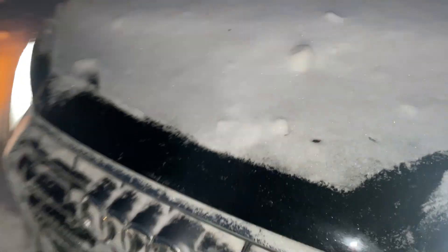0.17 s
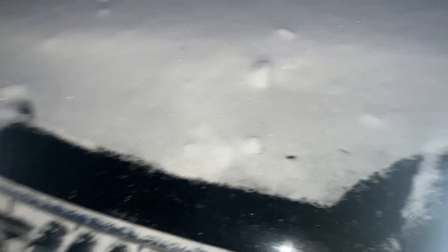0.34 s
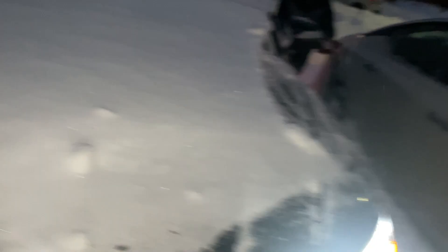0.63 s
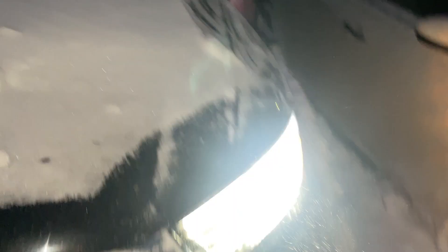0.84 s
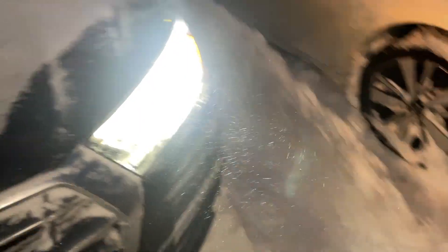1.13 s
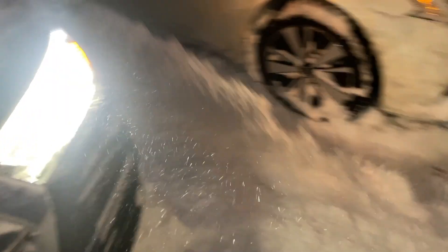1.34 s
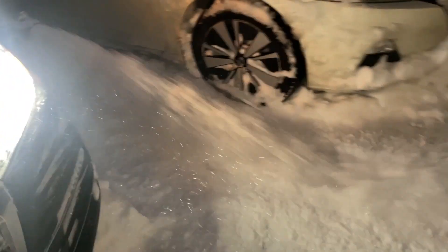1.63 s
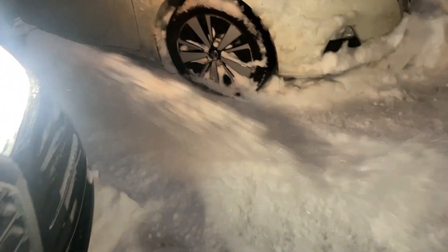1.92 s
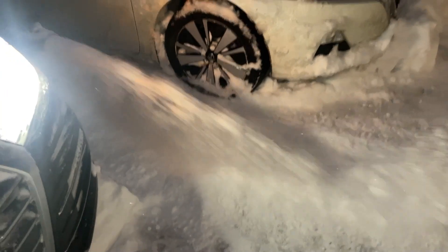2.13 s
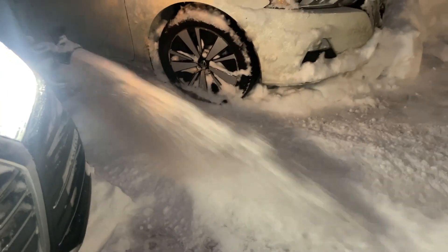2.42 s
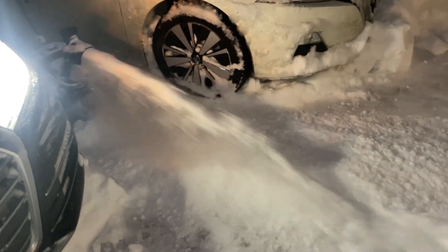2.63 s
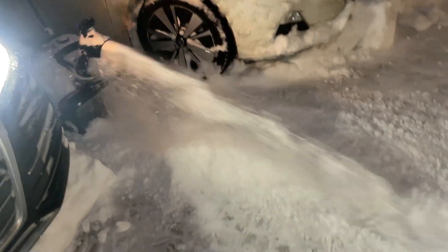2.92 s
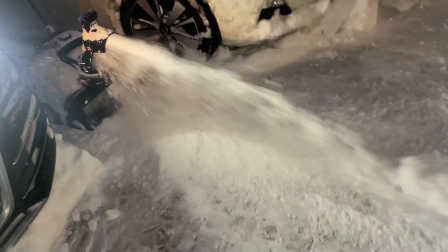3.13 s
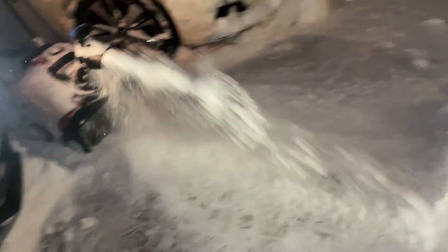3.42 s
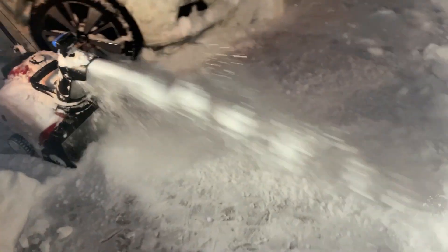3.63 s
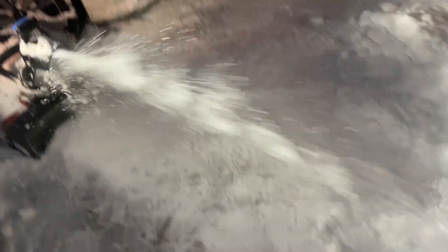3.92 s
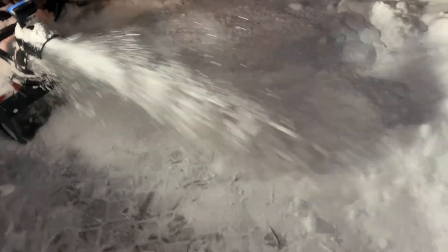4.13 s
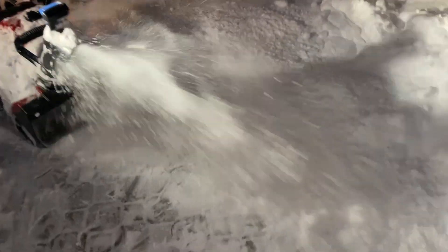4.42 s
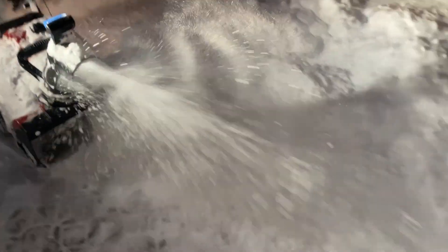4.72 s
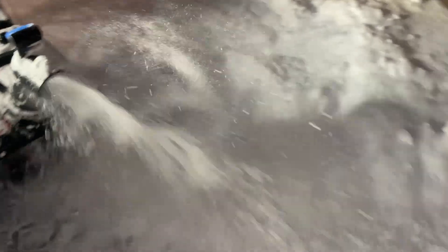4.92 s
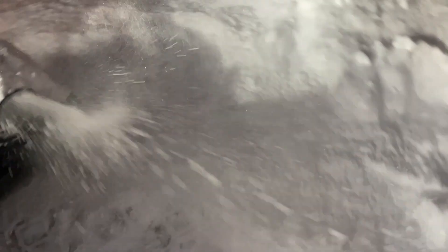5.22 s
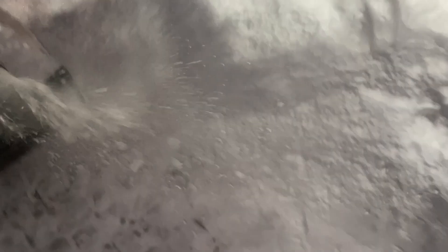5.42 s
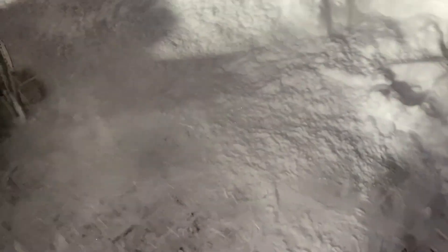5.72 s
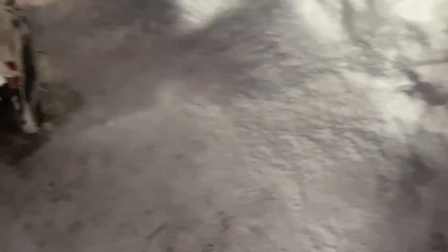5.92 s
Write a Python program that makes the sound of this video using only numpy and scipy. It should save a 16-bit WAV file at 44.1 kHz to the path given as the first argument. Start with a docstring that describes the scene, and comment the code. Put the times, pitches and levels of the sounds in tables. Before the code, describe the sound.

Outdoors between parked cars, a small petrol snow blower runs throughout, heard close on a hand-held phone. Dull and on the right at first, it swings quickly left, its fast putter, gritty exhaust and wavering low drone growing. Snow churns and hisses, with hollow knocks, panel rattle and scattered metallic pops. Near the end the drone drops away, leaving a softer engine hum, thin tones and bright ice ticks.

```python
"""Between parked cars, a single-cylinder snow blower passes a hand-held phone. The engine is a sum of multiples
of its firing rate and pulses that ring the muffler; the exhaust is noise gated by the valve. A belt drives a
three-blade impeller, a harmonic drone that sags with the load and combs with its echo off a car. Snow churns
and hisses as flickering noise bands; knocks, pops, rattle, a squeak, tones and ice ticks are added. The phone
turns, so phase and balance between two ports carry the machine from right to left."""
import sys
import numpy as np
from scipy import signal
from scipy.fft import rfft, irfft, next_fast_len
from scipy.io import wavfile
from scipy.ndimage import uniform_filter1d

SR = 44100
rng = np.random.default_rng(int(sys.argv[2]) if len(sys.argv) > 2 else 0)


def int16_out(signal):
    """Quantize to a 16-bit WAV file."""
    q = np.round(np.clip(np.atleast_2d(signal).T, -1, 1) * 32767)
    wavfile.write(sys.argv[1], SR, q.astype(np.int16))


N = 267157
T = np.arange(N) / SR  # time in seconds
LONG = next_fast_len(N)

# Engine speed. Each row: time in seconds, firings per second.
ENGINE_SPEED = [(0.0, 33.9), (0.3, 30.91), (0.42, 31.32), (0.72, 34.52), (0.9, 33.07), (1.05, 33.06),
                (1.23, 35.12), (1.65, 34.12), (1.8, 31.53), (2.07, 32.09), (2.4, 35.1), (2.85, 34.87),
                (3.0, 33.84), (3.66, 35.29), (3.72, 34.81), (3.99, 35.71), (4.32, 33.66), (4.98, 37.24),
                (5.25, 35.47), (5.49, 36.79), (6.06, 36.43)]
FIRST_FIRING = .45  # share of a cycle that passes before the first firing
# Engine note. Each row: multiple of the firing rate, relative level in dB.
ENGINE_ORDERS = [(1, -18), (3, -8), (4, -10), (5, 0), (6, -3), (7, -2), (8, -5), (9, -14), (10, -17)]
# Muffler resonances. Each row: frequency in Hz, width of a single pass in Hz, relative level in dB.
MUFFLER_MODES = [(570, 110, -8), (735, 45, -7), (815, 45, -7), (1145, 40, -12), (1215, 40, -8)]
EMPTY_S = 5.15  # the housing has run empty and its drone is gone
# The engine note under load, and the rise and its duration as the machine runs empty.
NOTE_DB, NOTE_CLEARS_DB, NOTE_CLEARS_S = -32, 6.5, .6

# Source levels before the ports. Each row: time in seconds, crank thump in dB, churn in dB, treble in dB,
# exhaust puff against hiss in dB, the same for the bands centred on 8 kHz and above in dB.
SOURCE_LEVELS = [(0, -26, -24.5, -41.5, 1, 0), (.35, -23.5, -26.5, -29.5, 6.5, 11),
                 (.71, -20.5, -20, -26.5, 8.5, 5.5), (1.38, -21, -21, -27, 8, 5.5),
                 (1.6, -21, -21.5, -25.5, 9, 6), (2.08, -21, -19.5, -23, 7.5, 16),
                 (2.6, -23, -20, -26.5, 5, 1.5), (2.9, -23.5, -17, -24, -0.5, -0.5),
                 (3.9, -23, -18.5, -26, 3.5, 0), (4.2, -31, -16.5, -28, -1.5, -3),
                 (4.6, -24, -23.5, -26.5, 1.5, -2), (4.98, -27.5, -18.5, -30.5, -5.5, -2),
                 (5.38, -26.5, -23.5, -33.5, -8, -5), (5.63, -28, -25, -36.5, -5, -14),
                 (6.06, -26, -26.5, -29.5, -14, -12)]
# Exhaust colour. Each row: frequency in Hz, relative density in dB per Hz.
GAS_COLOUR = [(600, -5), (1200, 4), (1900, 5.5), (2600, 0), (3400, 2), (4600, -4), (5100, -1.5), (5600, -9),
              (7500, -7.5), (9800, -1.5), (11500, -5), (12350, -0.5), (13500, -14), (14500, -11),
              (16300, -34)]
# The valve shuts with a smaller spit: share of the cycle, mean level in dB.
VALVE_AT, VALVE_DB = .45, -12

BELT_RATIO = 1.615  # blade beats per firing where the belt grips
# Belt slip under a heavy bite. Each row: middle in seconds, half length in seconds, peak share of blade speed lost.
BELT_SLIPS = [(.67, .06, .025), (.92, .07, .02), (1.3, .05, .012), (1.63, .11, .022)]
# The three blades bite unevenly. Each entry: level of one blade in dB, before smoothing.
BLADE_BITE_DB = [1, -0.028, 2.4]
# Blade harmonics. Each row: multiple of the blade rate, relative level in dB, phase in radians.
BLADE_ORDERS = [(2, -8.5, 3.5), (3, -0.4, 0.5), (4, 2.6, 1), (5, -4.5, 0.42), (1, -15.5, 2.5),
                (6, -25, -0.5), (7, -20.5, 0)]
# Housing drone. Each row: time in seconds, drive in dB, delay of the echo off the nearest car in ms.
HOUSING_DRONE = [(0, -25, 7.4), (.25, -25.5, 8.05), (.59, -24, 7.9), (.87, -20.5, 8.1), (1.3, -21.5, 7.1),
                 (1.58, -19, 7), (1.7, -18, 6.4), (2.1, -15.5, 6.36), (2.41, -19, 5.66), (2.68, -15.5, 6.2),
                 (2.92, -16, 5.57), (3.18, -13.5, 6.54), (3.55, -17.5, 6.7), (3.76, -17.5, 7.25),
                 (4.21, -16.5, 7.8), (4.46, -17.5, 6.54), (4.77, -19.5, 5.85), (4.99, -28, 4.3)]
CAR_ECHO = 0.47  # share of the drone's amplitude that the car sends back
# Brief dips of the drone. Each row: time in seconds, change in dB.
DRONE_DIPS = [(.47, -4), (.94, -1), (1.62, -5.5), (1.95, -6.5), (4.33, -2)]
DIP_S = 0.028  # half length of a dip
# Colour of the drone. Each row: time in seconds, dB added to blade multiple 2, to 4, to 5, to both 6 and 7.
DRONE_TINT = [(0, 3, 0.5, 0, 5.5), (.7, 2, -1.5, 4.5, 7), (1, 2, 1, 4.5, -3), (1.35, 7, 0.5, 2.5, -4),
              (1.6, -2, 3.5, -4.5, -12), (1.85, 2, -4.5, 0, -23), (2.3, -3, -5, -1, -4),
              (2.85, 5, -2, 1, -16), (3.15, -4, -3.5, 0, -2), (3.4, 2.5, -4, 0.5, 8.5), (3.7, 0.5, 2, 0, 6),
              (3.95, -5, -0.5, -1, 1.5), (4.2, -1, 1.5, -4, 2), (4.4, -5, 0, -2.5, 9.5),
              (4.6, 2, -11, -7, 9.5), (4.8, 6.5, -7, 0.5, 6), (4.95, 11, -1, -8, 8)]

# Colour of tumbling snow. Each row: frequency in Hz, relative density in dB per Hz.
CHURN_COLOUR = [(30, -5), (60, -5), (120, 1.5), (200, 11.5), (300, 3.5), (420, -1.5), (620, 0), (800, -3.5),
                (1050, -9), (1350, -13), (1550, -19), (2500, -23.5)]
# Lumps of packed snow burst through the auger. Each row: time in seconds, swell of the churn in dB.
SNOW_LUMPS = [(.81, 3.5), (2.83, 3.5), (4.17, 1.5), (4.42, 5.5), (4.59, 8.5), (6.02, 6.5)]
LUMP_RISE_S, LUMP_FALL_S = 0.026, 0.11  # time constants

# Loose panels. Each row: time in seconds, level in dB.
PANEL_RATTLE = [(0, -39), (1, -36.5), (2.1, -29.5), (2.9, -28), (4.2, -33.5), (4.9, -32.5), (6.06, -32.5)]
# The hardest puffs ring the muffler shell. Each row: start in seconds, envelope peak in dB, pitch in Hz.
SHELL_POPS = [(0.326, -38, 4300), (0.575, -26, 1470), (0.606, -25, 1800), (0.636, -15, 2240),
              (0.753, -29, 1730), (0.782, -21, 1710), (0.841, -26, 1720), (1.0235, -27, 1790),
              (1.053, -17, 1700), (1.1116, -18, 2230), (1.634, -23, 1660), (1.6634, -20, 2190),
              (1.7245, -18.5, 3630), (1.817, -17, 3490), (1.943, -21, 4240), (2.069, -23, 1440),
              (2.1297, -17.5, 3330), (2.159, -20, 3270), (2.1896, -18, 3460), (2.4223, -22, 4310),
              (2.4508, -22, 3500), (2.508, -17.5, 3830), (2.702, -29, 3900), (2.7352, -25, 2520),
              (2.765, -29, 2480), (2.8217, -20, 2630), (3.1735, -26, 2930), (3.4629, -19, 2595),
              (3.578, -19, 3060), (3.8064, -14.5, 2950), (3.8636, -16, 2810), (3.9764, -21, 3290),
              (4.2612, -19.5, 3470), (4.3204, -20.5, 3620), (4.9614, -39, 3400), (4.9954, -39, 2560)]
POP_RISE_S, POP_RING_S = .0012, .003  # time constants
POP_ROUGH = .7  # depth of the noise on the ring
# The chute knocks in spells as it fills. Each row: middle in seconds, half length in seconds,
# pitch in Hz, level in dB, ring time in seconds.
CHUTE_KNOCKS = [(.9, 0.22, 770, -31, 0.0017), (1.202, 0.38, 617, -32, 0.01), (1.61, 0.27, 806, -28, 0.0015),
                (1.786, 0.064, 707, -25, 0.0025), (2.41, 0.26, 576, -31, 0.0014),
                (3.09, 0.42, 801, -29, 0.0015), (3.853, 0.39, 710, -30.5, 0.013),
                (3.7, 1, 1223, -38.5, 0.00086), (4.175, 0.067, 1076, -22.5, 0.0014),
                (4.95, 0.14, 747, -28, 0.0023)]
# A brief squeak. The entries: middle in seconds, half length in seconds, pitch in Hz, peak level in dB.
SQUEAK_TONE = (.95, .03, 1500, -28)
# Multiples sing out as the machine runs free. Each row: multiple of the firing rate, middle in seconds,
# half length in seconds, level in dB.
SINGING_ORDERS = [(5, 5.25, .15, -28), (7, 5.0, .07, -28), (8, 5.25, .17, -30), (6, 5.5, .08, -31),
                  (20, 5.85, .3, -38), (22, 5.62, .13, -35), (23, 5.97, .08, -39), (33, 5.68, .22, -40)]
# Ice grains tick near the phone. Each row: start in seconds, level of the noise in dB before envelope and filters.
ICE_TICKS = [(5.185, -22), (5.325, -20), (5.338, -21), (5.355, -22), (5.3714, -24), (5.385, -14.5),
             (5.4044, -21), (5.421, -22), (5.4367, -22), (5.7546, -19), (5.788, -20), (5.8227, -19),
             (5.8947, -13), (5.921, -13), (5.933, -14)]

# Phone heading. Each row: time in seconds, heading (-1 machine on the right, 1 on the left),
# then the level of each of the four shaded bands in dB.
PHONE_TURN = [(0, -1.48, -5, 6, 2, -1.5), (.5, -0.41, -0.5, 1.5, -1.8, -0.45), (1.2, 0.31, 3, 4, -2, -0.69),
              (1.5, 0.81, 1.5, 3, -1.5, 0.047), (2.7, 0.96, -2, 4.5, -0.2, 1.5),
              (4.5, 1.03, -4, 1.7, -2, 1.2), (5.6, 1.3, -3.5, 1, 1, 0.94),
              (6.06, 1.24, -3, -3.5, -3.5, 0.89)]
# Bands that hand and car bodies shade. Each row: lower edge in Hz, upper edge in Hz.
SHADED_BANDS = [(1500, 2000), (5600, 7500), (9000, 16500), (4900, 5600)]
# Two microphone ports. Each row: frequency in Hz, lead of the left in radians per unit of heading, fixed lead
# in radians, left minus right in dB per unit of heading, power share of the echo (0-1).
PORT_RESPONSE = [(30, .08, 0, 1.1, .04), (60, .08, 0, 1.1, .03), (260, .4, 0, 1.2, .06),
                 (430, .8, 0, 2.2, .22), (700, 1.2, 0, 6.5, .35), (1050, 1.7, 0, 7, .38),
                 (1400, 2.3, 0, 6, .35), (2000, 3.7, .2, .3, .45), (2750, 5.8, .7, .3, .45),
                 (2950, 0, .7, 1.5, .5), (3600, 0, 1.1, 6, .55), (4500, 0, .9, 7, .55),
                 (5500, 0, -.4, 4, .55), (6900, 0, -1.1, 2.2, .55), (8000, 0, -2.8, .8, .15),
                 (8600, 0, -3.14, 0, .02), (9500, 0, -3.7, 0, .15), (11000, 0, -4.7, 0, .3),
                 (12200, 0, -5.4, 0, .28), (13200, 0, -6.28, 0, .04), (16500, 0, -6.28, 0, .01)]
ECHO_T60_S = 0.052  # decay of the echo before its spectrum is flattened
TOP_HZ = 15750


def undb(db):
    """Decibels are logarithmic: 20 dB is a tenfold amplitude."""
    return 10 ** (np.asarray(db) / 20)


def unit(x):
    """Normalisation to an rms of 1."""
    return x / np.sqrt(np.mean(x ** 2))


def curves(table):
    """Linear interpolation of a time table's columns to one value a sample."""
    s, *columns = np.transpose(table)
    return [np.interp(T, s, c) for c in columns]


def shape(hz, spectrum):
    """Spectral gain, interpolated in dB over log frequency."""
    at, db = np.transpose(spectrum)
    return undb(np.interp(np.log(hz + 1), np.log(at), db))


def walk(rate):
    """Slow random modulation: levels held 1 / rate seconds and smoothed twice."""
    k = int(SR / rate)
    held = np.repeat(rng.standard_normal(N // k + 1), k)
    return 0.8 * uniform_filter1d(uniform_filter1d(held, k), k)[:N]


def each(turns, spread):
    """Cycle-to-cycle variation: one random value for every cycle of a phase."""
    return spread * rng.standard_normal(1000)[np.floor(turns).astype(int) + 1]


def split(spectrum, lowest_hz, count):
    """A filter bank cuts coloured noise into overlapping bands half an octave apart."""
    hz = np.fft.rfftfreq(LONG, 1 / SR)
    place = 2 * np.log2(hz / lowest_hz + 1e-9)
    shares = np.clip(1 - abs(place - np.arange(count)[:, None]), 0, 1)
    noise = rfft(rng.standard_normal(LONG)) * shape(hz, spectrum)
    return irfft(noise * shares, LONG)[:, :N]


def bands(spectrum, lowest_hz, flicker_db, rate, count):
    """Independent modulation: each band of coloured noise flickers on its own."""
    noise = split(spectrum, lowest_hz, count)
    return unit(sum(undb(flicker_db * walk(rate)) * band for band in noise))


def rung(pulses, hz, width):
    """Resonance: a mode passed twice builds up softly before it decays."""
    mode = signal.iirpeak(hz, hz / width, SR)
    return unit(signal.lfilter(*mode, signal.lfilter(*mode, pulses)))


def engine(fired, thump_db):
    """Periodic forcing: a crank thump twice a firing, other multiples, and pulses that excite muffler modes."""
    thump = undb(thump_db + 1.05 * walk(17)) * np.sin(4 * np.pi * fired + 0.5 * walk(20))
    note = 0
    for k, db in ENGINE_ORDERS:
        note = note + undb(db + .8 * walk(9)) * np.sin(2 * np.pi * (k * fired + rng.random()))
    pulses = np.diff(np.floor(fired), prepend=-1) * undb(each(fired, 1.5))
    ring = sum(undb(db + 2.5 * walk(6)) * rung(pulses, hz, width) for hz, width, db in MUFFLER_MODES)
    note_db = NOTE_DB + NOTE_CLEARS_DB * np.clip((T - EMPTY_S) / NOTE_CLEARS_S + .5, 0, 1)
    return np.sqrt(2) * thump + undb(note_db) * (note + undb(-10) * ring)


def spit(since, tail):
    """Blow-down of gas: a fast rise, a fast decay and a slower tail."""
    return (1 - np.exp(-since / .002)) * (np.exp(-since / .0028) + tail * np.exp(-since / .012))


def exhaust(fired, puff_db, top_db):
    """Turbulent noise: steady hiss plus a puff at each valve opening, of its own size and colour."""
    cycles_per_s = np.gradient(fired, T)
    since_open = (fired % 1) / cycles_per_s
    since_shut = ((fired - VALVE_AT) % 1) / cycles_per_s
    shut = undb(VALVE_DB + each(fired - VALVE_AT + 1, 4)) * spit(since_shut, 0)
    size_db = each(fired, .9)
    gas = 0
    for i, band in enumerate(split(GAS_COLOUR, 500, count=11)):
        # the top bands, 8 kHz and above, fizz longer
        share, tail = (undb(top_db), .4) if i >= 8 else (undb(puff_db), .14)
        puff = share * undb(size_db + each(fired, 1.2)) * unit(spit(since_open, tail) + shut)
        hiss = undb(0.5 * walk(20))
        gas = gas + band * np.sqrt((hiss ** 2 + puff ** 2) / (1 + share ** 2))
    return unit(gas)


def impeller(beats):
    """Interference: blade harmonics drone in the housing, some strengthened and some cancelled by a car's echo."""
    drone_db, late_ms = curves(HOUSING_DRONE)
    drone_db = drone_db + sum(db * np.exp(-((T - s) / DIP_S) ** 2) for s, db in DRONE_DIPS)
    # each blade carries a different load of snow
    load_db = np.take(BLADE_BITE_DB, np.floor(beats).astype(int) % 3) + each(beats, 1.4)
    full = np.clip((EMPTY_S - T) / 0.26, 0, 1)
    second, fourth, fifth, upper = curves(DRONE_TINT)
    tint_db = {2: second, 4: fourth, 5: fifth, 6: upper, 7: upper}
    late = np.gradient(beats, T) * late_ms / 1000  # echo delay in blade cycles
    drone = 0
    for k, db, phase in BLADE_ORDERS:
        rough = 1 if k in (3, 4, 5) else 3.5  # the weaker multiples waver more
        # only the size of the echo sum is used, so the shape of the thud stays
        comb = abs(1 + CAR_ECHO * np.exp(-2j * np.pi * k * late))
        level = undb(db + tint_db.get(k, 0) + .9 * rough * walk(25))
        drone = drone + comb * level * np.cos(2 * np.pi * k * beats + phase + .16 * rough * walk(12))
    return np.sqrt(2) * full * undb(drone_db + uniform_filter1d(load_db, size=200)) * drone


def churn(beats, fired):
    """Amplitude modulation: noise of tumbling snow throbs with blades and firings and swells at each lump."""
    lumps_db = 0
    for s, db in SNOW_LUMPS:
        lumps_db = lumps_db + db * np.exp(-abs(T - s) / np.where(T < s, LUMP_RISE_S, LUMP_FALL_S))
    throb = 1 + 0.14 * np.cos(2 * np.pi * beats) + 0.14 * np.cos(4 * np.pi * beats)
    throb = throb + 0.079 * np.cos(2 * np.pi * (fired - .22))
    return undb(lumps_db) * bands(CHURN_COLOUR, 28.0, 0.5, 11, count=15) * throb


def rattle(fired):
    """Repeated impact: decaying mid-range noise, strong about the firing and weaker on the return stroke."""
    def burst(at):
        """Exponential decay over a share of the cycle, with a random size each time."""
        return undb(each(fired - at + 1, 3)) * np.exp(-((fired - at) % 1) / .14)

    band = signal.butter(2, [400, 1400], "band", fs=SR, output="sos")
    grit = signal.sosfilt(band, rng.standard_normal(N))
    return undb(curves(PANEL_RATTLE)[0]) * unit(grit * (burst(-.06) + .6 * burst(.72)))


def pops():
    """Shell resonance: each pop is a short decaying sine, roughened by noise, at its own pitch."""
    out, t = np.zeros(N + 900), T[:900]
    swell = (1 - np.exp(-t / POP_RISE_S)) * np.exp(-t / POP_RING_S)
    swell = swell / swell.max()
    for s, db, hz in SHELL_POPS:
        grit = rng.standard_normal(900)
        wobble = 1 + POP_ROUGH * unit(uniform_filter1d(grit, size=12))
        start = int(s * SR)
        out[start:start + 900] += undb(db) * swell * wobble * np.sin(2 * np.pi * hz * t + grit[0])
    return out[:N]


def chute(beats):
    """Cavity resonance: a short hollow ring follows each blade, varying in phase and size."""
    since = (beats % 1) / np.gradient(beats, T)
    scatter, size = each(beats, 0.75), undb(each(beats, 2.5))
    knocks = 0
    for s, half, hz, db, ring in CHUTE_KNOCKS:
        # a short ring starts anywhere in its cycle, a long one holds its pitch
        tone = np.sin(2 * np.pi * hz * T + 0.004 / ring * scatter)
        knock = unit(since * np.exp(-since / ring) * tone)
        knocks = knocks + undb(db) * np.exp(-((T - s) / half) ** 2) * knock
    return size * knocks


def squeak():
    """A pure tone with slight phase wander swells and fades."""
    at, half, hz, db = SQUEAK_TONE
    swell = np.exp(-((T - at) / half) ** 4)
    return undb(db) * swell * np.sin(2 * np.pi * hz * T + .5 * walk(67.0))


def singing(fired):
    """Harmonics: thin tones locked to the firing rate swell and fade, straight from the left without echo."""
    tones = 0
    for k, s, half, db in SINGING_ORDERS:
        swell = undb(db + 1.5 * walk(9)) * np.exp(-((T - s) / half) ** 4)
        tones = tones + swell * np.sin(2 * np.pi * (k * fired + rng.random()))
    return np.sqrt(2) * tones * undb([[2.5], [-2.5]])  # left, right


def ticks():
    """Impulsive noise: short bright cracks through two band-pass filters."""
    out, t = np.zeros(N + 800), T[:800]
    crack = (1 - np.exp(-t / .0008)) * np.exp(-t / .004)
    for s, db in ICE_TICKS:
        start = int(s * SR)
        out[start:start + 800] += undb(db) * rng.standard_normal(800) * crack

    def band(lo, hi):
        """Band-pass filtering between two edges in Hz."""
        return signal.sosfilt(signal.butter(2, [lo, hi], "band", fs=SR, output="sos"), out[:N])

    return band(6500, 12500) + band(3000, 5500)


def ports(sound):
    """Directional hearing: phase lead and balance follow the heading; cars and walls echo differently to each port."""
    tails = rfft(rng.standard_normal((2, 6000)) * undb(-60 * T[:6000] / ECHO_T60_S))
    # dividing by the magnitude keeps the smear in time but evens the colour
    echo = [signal.fftconvolve(sound, h)[:N] for h in irfft(tails / abs(tails))]
    hz, s, (direct, *echoes) = signal.stft(np.array([sound, *echo]), SR, nperseg=512, noverlap=384)
    # the hand never rests, so the echo paths keep drifting, by more cycles in the treble
    steps = uniform_filter1d(rng.standard_normal((2, *direct.shape)), size=6, axis=1)
    drift = np.cumsum(steps, axis=2) * np.clip(hz / 3000, .2, 1)[:, None]
    heading, *shade_db = (np.interp(s, T, c) for c in curves(PHONE_TURN))
    shade_db = sum(db * ((hz > lo) & (hz < hi))[:, None] for db, (lo, hi) in zip(shade_db, SHADED_BANDS))
    at, *columns = np.transpose(PORT_RESPONSE)
    turning, fixed, balance_db, wet = (np.interp(hz, at, c)[:, None] for c in columns)
    wet = np.clip(wet, 0, 1)
    side = np.array([.5, -.5])[:, None, None]  # half of each difference to left and right
    heard = np.sqrt(1 - wet) * direct * np.exp(1j * side * (turning * heading + fixed))
    heard = heard + np.sqrt(wet) * np.array(echoes) * np.exp(1j * drift)
    gain = undb(side * balance_db * heading + shade_db)
    return signal.istft(heard * gain, SR, nperseg=512, noverlap=384)[1][:, :N]


def scene():
    """Superposition: the sources add and reach the two ports, with the blades geared to the engine by the belt."""
    turns = np.cumsum(curves(ENGINE_SPEED)[0]) / SR
    fired = turns - FIRST_FIRING
    grip = 1 - sum(lost * np.exp(-((T - s) / half) ** 2) for s, half, lost in BELT_SLIPS)
    beats = BELT_RATIO * np.cumsum(grip * np.gradient(turns))
    thump_db, churn_db, treble_db, *puff_db = curves(SOURCE_LEVELS)
    machine = engine(fired, thump_db) + impeller(beats) + rattle(fired)
    machine = machine + pops() + chute(beats) + squeak()
    snow = undb(churn_db) * churn(beats, fired)
    treble = undb(treble_db) * exhaust(fired, *puff_db)
    return ports(machine + snow + treble + ticks()) + singing(fired)


def record(dry):
    """Saturation and band limiting: the phone rounds the loudest peaks and cuts the top."""
    low_pass = signal.ellip(10, .2, 80, TOP_HZ, fs=SR, output="sos")
    return signal.sosfilt(low_pass, np.tanh(1.05 * dry))


dry = scene()
out = record(dry)
int16_out(out)
```